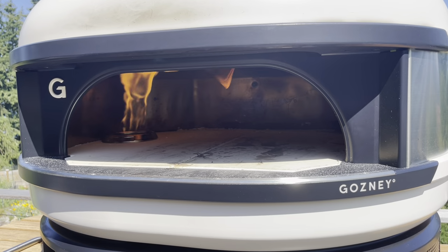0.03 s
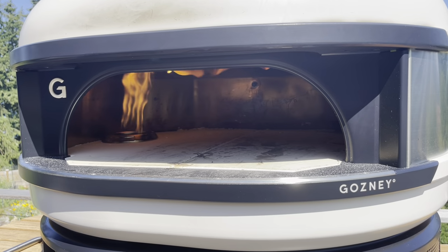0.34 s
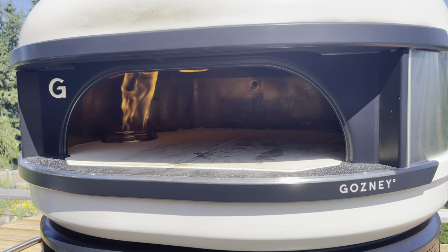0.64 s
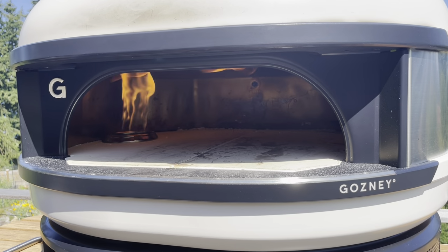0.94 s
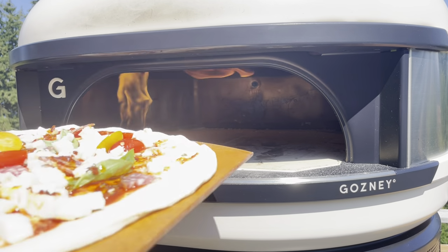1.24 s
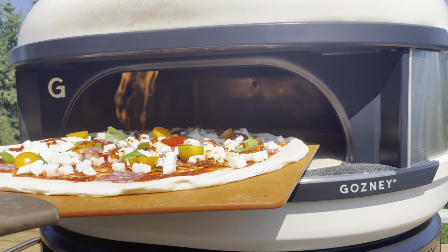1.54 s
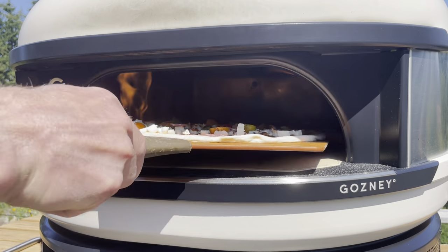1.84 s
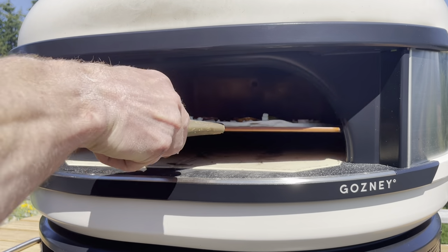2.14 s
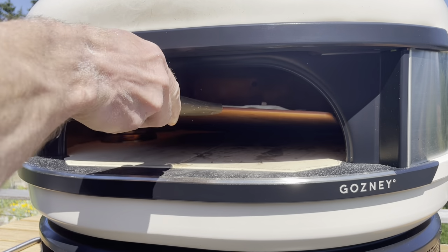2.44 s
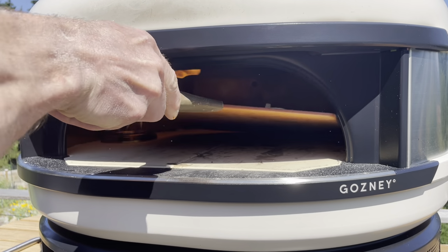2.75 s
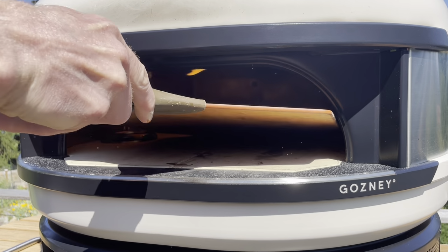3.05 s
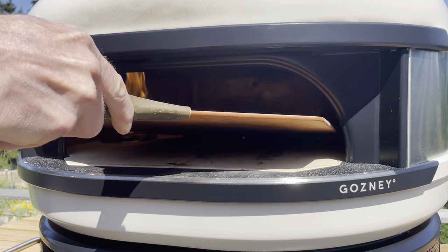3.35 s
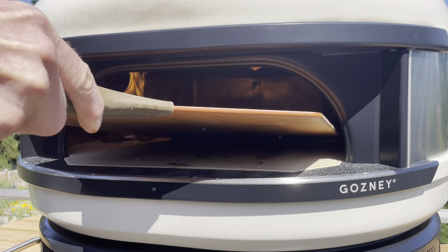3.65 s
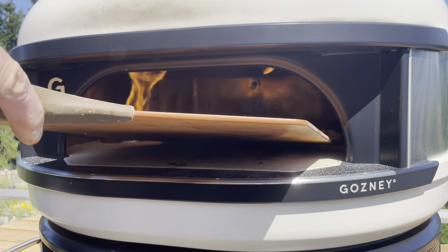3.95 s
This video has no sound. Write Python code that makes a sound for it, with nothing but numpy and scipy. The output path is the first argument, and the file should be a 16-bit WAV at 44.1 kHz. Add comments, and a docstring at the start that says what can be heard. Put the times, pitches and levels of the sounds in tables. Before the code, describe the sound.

A wooden pizza peel scrapes inside an outdoor gas oven, close by. At first the burner flutters low, with brief wind buffets, a faint hum and a distant engine. Small clicks come at 1.5 seconds and a tap at 1.9. From 2.1 to 4 seconds the peel jerks back and forth on the stone, hissing and rasping, with hollow knocks strongest near 2.8 and 3.3 seconds.

```python
"""A gas oven's low burner flutters outdoors, with wind on the microphone, a hum and a far engine sinking
in pitch. The flame flares and the hot shell ticks once. Then a wooden pizza peel taps the oven's mouth,
knocks down on the floor and is jerked back and forth to shed its load: flour and grit hiss under the
blade, the wood rasps and judders on the stone, and the dome colours it all with a short ring."""
import sys
import numpy as np
from scipy import signal
from scipy.fft import rfft, irfft
from scipy.io import wavfile

SR = 44100
rng = np.random.default_rng(int(sys.argv[2]) if len(sys.argv) > 2 else 0)


def persist_wave(psi):
    """Save psi, clipped to +-1, as 16-bit WAV."""
    counts = np.round(np.clip(psi, -1, 1) * 32767).astype(np.int16)
    wavfile.write(sys.argv[1], SR, np.atleast_2d(counts).T)


N = 176400
T, HZ = np.arange(N) / SR, np.fft.rfftfreq(N, 1 / SR)

# Tone curves of the noise layers: frequency_hz, relative_db
BURNER_TONE = [(20, -40), (35, -13), (55, -1), (78, -1), (110, -9.5), (200, -9), (270, -14), (350, -21),
               (600, -20), (1000, -28.5), (4000, -42.5), (9000, -49), (16000, -54)]  # low roar of the flame
AIR_TONE = [(20, -17), (60, -7), (200, -7.5), (1500, -18), (9000, -52), (14000, -72)]  # diffuse outdoor air
WIND_TONE = [(20, -30), (45, -5), (62, 1), (120, -7.5), (400, -38), (2000, -73)]  # rumble on the microphone
FLARE_TONE = [(300, -20), (2000, 3), (6000, -3), (16000, -10)]  # bright breath of the flame
CLICK_TONE = [(60, -14), (400, 5.5), (1500, 0), (6000, -3), (11000, -2), (16000, -7)]  # cracking grit
THUD_TONE = [(60, -18), (200, 0), (600, 0.5), (1400, -4.5), (2200, -13.5), (3500, -22), (16000, -45)]  # dull body of a knock
HISS_TONE = [(100, -42), (600, -32), (1500, -18), (2600, -12), (4100, -8), (5000, -4.5), (5700, -7),
             (6500, 1.5), (7500, .3), (9000, -1.5), (11000, -2), (13500, -7), (16000, -10.5)]  # flour and grit under the blade
RASP_TONE = [(60, -20), (250, -7.5), (400, -5.5), (540, -6), (595, 7.5), (655, 9), (720, -7), (950, 2),
             (1100, -3), (1400, 1), (2100, 0), (2900, -10), (6000, -17), (16000, -36)]  # wood rubbing on stone
EDGE_TONE = [(100, -42), (1500, -23), (2200, -4), (3300, -1.5), (5500, -0.5), (7500, -2.5), (10000, -9),
             (13000, -19), (16000, -45)]  # low-treble hiss of the blade's edges

# How far the left microphone port leads the right: frequency_hz, phase_rad
PORT_LEAD = [(20, 0), (1700, 0), (3100, 0.61), (5300, 1), (5700, -2.1), (6500, -0.5), (7100, -2),
             (7600, -2), (8500, -3.5), (10500, -4.5), (13200, -6), (16000, -6.5)]
# Decay of the dome's ring: frequency_hz, t60_s
DOME_DECAY = [(600, 0.18), (2000, 0.24), (7000, 0.01), (16000, 0.07)]
# The dome's ring against the direct sound: frequency_hz, relative_db
DOME_SEND = [(100, -11.5), (600, -4.5), (2000, -7.5), (4000, -4), (7000, -4.5), (11000, -9.5), (14000, -24)]
# Distant engine: time_s, firing_hz, harmonic_1_db, harmonic_2_db, harmonic_5_db
ENGINE_CURVE = [(0, 47.2, -59, -52, -49), (0.599, 44.8, -62, -51, -52), (1, 43.4, -63, -47, -46),
                (1.7, 41.97, -52, -44, -48.5), (2.1, 41, -51, -47, -47), (2.7, 39.78, -52, -50, -55),
                (4, 38.67, -54, -50, -60)]
# Fader ride of the hum: time_s, level_db
HUM_RIDE = [(0, -60), (1.5, -56), (3, -48), (4, -51)]
# Wind buffets: centre_s, half_width_s, level_db
WIND_GUSTS = [(.115, 0.036, -28), (.27, .03, -39.5), (.47, 0.037, -37), (1.56, .04, -30.5),
              (1.68, 0.069, -39)]
# The flame flaring: centre_s, half_width_s, level_db
FLAME_FLARES = [(.89, .1, -67)]
# Dry clicks of the peel and of grit cracking under it: start_s, level_db
GRIT_CLICKS = [(1.5012, -42), (1.516, -44), (1.523, -31), (2.2105, -29), (2.691, -31), (2.723, -25.5)]
# Modes of the peel tapping the oven's mouth: pitch_hz, relative_db, t60_s
MOUTH_MODES = [(600, -5, .03), (880, -5, .025), (1130, 0.5, 0.021), (1420, -4, 0.025), (2985, -14, .035)]
# The board strikes the oven: start_s, level_db, contact_ms, click_db, bend_db
BOARD_KNOCKS = [(2.0937, -34, 0.16, -34.5, -55), (2.1405, -38, .2, -43, -50),
                (2.1466, -25.5, .36, -42, -36), (2.586, -30.5, 0.35, -50, -42),
                (2.600, -35.5, .7, -60, -24), (2.7653, -22, 0.22, -36, -31), (2.792, -34.5, 0.31, -50, -20),
                (2.8457, -34.5, .45, -55, -30), (3.2806, -19.5, .75, -52, -23),
                (3.301, -28.5, .35, -50, -25)]
# Modes of the board on the oven floor: pitch_hz, relative_db, t60_s
BOARD_MODES = [(238, -5, .16), (316, -7.5, 0.06), (449, -2, 0.072), (598, -2, 0.073), (643, -8, 0.063),
               (767, -8.5, .05), (865, -9, 0.067), (934, -4.5, 0.056), (1076, -2.5, 0.034),
               (1225, -5, 0.032), (1414, -3.5, 0.042), (1630, -7, .035), (2070, -1, .03), (2380, -14, .03)]
# Slides of the peel: start_s, length_s, rise_s, release_s, hiss_db, rasp_db
PEEL_STROKES = [(2.105, 0.049, 0.013, 0.014, -37.5, -41.5), (2.138, 0.087, 0.006, 0.02, -43.5, -43.0),
                (2.206, 0.054, 0.0043, 0.017, -34, -42.0), (2.242, 0.066, 0.019, 0.029, -39.5, -47),
                (2.283, 0.085, 0.017, 0.038, -36, -40.0), (2.341, 0.063, 0.036, 0.013, -44.0, -47),
                (2.42, 0.078, 0.019, 0.029, -46.5, -55.5), (2.481, 0.075, 0.017, 0.019, -42.5, -49),
                (2.536, 0.069, 0.017, 0.035, -36.0, -37.5), (2.595, 0.046, 0.029, 0.015, -27.5, -34.5),
                (2.632, 0.06, 0.006, 0.033, -32, -40.5), (2.68, 0.09, 0.014, 0.048, -25.5, -37),
                (2.75, 0.038, 0.012, 0.026, -28.5, -38), (2.777, 0.079, 0.024, 0.032, -28.5, -36.0),
                (2.846, 0.051, 0.03, 0.0022, -36.5, -45.5), (2.89, 0.061, 0.011, 0.029, -28.5, -42.5),
                (2.898, 0.014, 0.0028, 0.009, -18.0, -42.0), (2.944, 0.06, 0.012, 0.012, -44.5, -52.5),
                (3, 0.063, 0.021, 0.012, -28.5, -43.0), (3.054, 0.063, 0.0093, 0.051, -25.0, -43.0),
                (3.106, 0.088, 0.029, 0.046, -29.5, -43.0), (3.188, 0.08, 0.024, 0.034, -27.0, -44),
                (3.258, 0.11, 0.02, 0.071, -36, -43.5), (3.345, 0.14, 0.021, 0.069, -24, -42),
                (3.444, 0.081, 0.029, 0.038, -40.0, -51.5), (3.512, 0.095, 0.053, 0.027, -30, -40.5),
                (3.604, 0.073, 0.025, 0.023, -35, -45.5), (3.671, 0.092, 0.013, 0.036, -29.5, -42.5),
                (3.701, 0.037, 0.0087, 0.021, -22.5, -41), (3.748, 0.087, 0.026, 0.031, -38, -46.5),
                (3.808, 0.16, 0.044, 0.038, -29, -43), (3.956, 0.045, 0.012, 0.015, -50.5, -62)]
# Low treble in the hiss, growing as the peel is drawn out: time_s, relative_db
LOW_TREBLE_RIDE = [(2.1, -13), (2.9, -12), (3.3, -10.5), (3.6, -6.5)]
# The blade catches on the stone, each spot of wood at its own pitch: start_s, level_db, pitch_hz
BLADE_CATCHES = [(2.115, -37, 2300), (2.209, -33, 1400), (2.235, -34, 1270), (2.292, -38, 1000),
                 (2.328, -36, 1300), (2.551, -37, 1500), (2.623, -33.5, 1580), (2.689, -29, 1430),
                 (2.714, -31, 1050), (2.719, -33, 610), (2.815, -34, 2380), (2.898, -35, 1510)]

BURNER_DB, FLICKER_DB, AIR_DB = -44.5, 1.24, -53
ECHO_SPAN_S, ECHO_DB, ECHO_SHIFT_S = .006, -7.5, .13
CLICK_T60_S, THUD_T60_S, THUD_DB = .034, .059, -3.5
BEND_HZ, BEND_RISE_S, BEND_T60_S, BEND_FLUTTER_DB = 179.1, .016, .22, 2
BEND_SAG, BEND_SAG_S = .22, .013  # the bending note starts this share sharp and sinks
GRAINS_PER_S, GRAIN_SPREAD_DB, CHATTER_DB, CHATTER_HZ = 12000, 2.5, 2.5, 140
BALANCE_DB = .25  # the peel sits a touch to the left
SIDE = np.array([[1], [-1]])  # opposite polarity left and right, for width


def amp(db):
    """Decibels to gain."""
    return np.exp(np.asarray(db) * (np.log(10) / 20))


def unit(x):
    """Scales to rms 1."""
    return x / np.sqrt(np.mean(x ** 2) + 1e-20)


def read(points, hz):
    """Reads a curve along log frequency."""
    f, value = np.transpose(points)
    return np.interp(np.log(hz + 1), np.log(f + 1), value)


def colour(x, tone):
    """Equalises a signal with a tone curve, at rms 1."""
    return unit(irfft(rfft(x) * amp(read(tone, HZ)), N))


def noise(tone):
    """Coloured noise of rms 1."""
    return colour(rng.standard_normal(N), tone)


def wander(hz):
    """Smooth random modulation of about rms 1, rolled off above hz."""
    f = np.fft.rfftfreq(4000, N / SR / 4000)
    slow = unit(irfft(rfft(rng.standard_normal(4000)) / (1 + (f / hz) ** 4)))
    return np.interp(T, np.linspace(0, N / SR, len(slow)), slow)


def add(mix, start_s, sound):
    """Mixes a sound in at its cue."""
    part = mix[round(start_s * SR):][:len(sound)]
    part += sound[:len(part)]


def swells(rows):
    """An envelope of bell-shaped bumps."""
    return sum(amp(db) * np.exp(-np.minimum(((T - s) / width) ** 2, 20)) for s, width, db in rows)


def burst(tone, t60_s):
    """A quarter second of noise with a hard attack, dying away."""
    return (noise(tone) * amp(-60 * T / t60_s))[:SR // 4]


def ringing(modes):
    """A quarter second of dying sines, one row for each mode."""
    t = T[:SR // 4]
    hz, db, t60 = np.transpose(modes)[:, :, None]
    return amp(db - 60 * t / t60) * np.sin(2 * np.pi * hz * t)


def oven(x):
    """Close wall echoes, new on each call, and the dome's short ring, heard at two microphone ports."""
    size, lead, echoes = 8192, 128, 12
    f, walls = np.fft.rfftfreq(size, 1 / SR), np.zeros(size)
    polarity = rng.choice([-1, 1], echoes)
    delays_s = (.15 + rng.random(echoes)) * ECHO_SPAN_S
    walls[(delays_s * SR).astype(int)] = polarity / np.sqrt(echoes)
    ports = np.array([np.exp(1j * read(PORT_LEAD, f)), np.ones(len(f))])
    early = (1 + amp(ECHO_DB) * rfft(walls) * f / (f + 1500)) * ports  # the echoes carry little bass
    hz, t, bands = signal.stft(rng.standard_normal((2, size)), SR, nperseg=256)
    t60 = read(DOME_DECAY, hz)[:, None]
    decay = amp(-60 * t / t60) * np.sqrt(np.log(1e6) / (t60 * SR))  # equal energy in each band
    tail = signal.istft(bands * decay, SR, nperseg=256)[1]
    wet = amp(read(DOME_SEND, f))
    response = (early + wet * rfft(tail, size)) / np.sqrt(1 + wet ** 2)
    impulse = np.roll(irfft(response), lead, axis=1)
    return signal.oaconvolve(np.atleast_2d(x), impulse, axes=1)[:, lead:lead + N]


def burner():
    """The gas flame's low roar flutters inside the dome."""
    return amp(BURNER_DB + FLICKER_DB * wander(13.5)) * oven(noise(BURNER_TONE))


def outdoor_air():
    """A wide, soft bed of open air."""
    return amp(AIR_DB) * noise(AIR_TONE) * SIDE


def distant_engine():
    """Three wavering harmonics of a firing rate that slowly sinks."""
    times, firing_hz, *levels = np.transpose(ENGINE_CURVE)
    cycles = np.cumsum(np.interp(T, times, firing_hz) * (1 + .0021 * wander(5.8))) / SR
    out = np.zeros(N)
    for harmonic, db in zip((1, 2, 5), levels):
        level = amp(np.interp(T, times, db) + 1.66 * wander(7.3))
        out += level * np.sin(2 * np.pi * (harmonic * cycles + rng.random()))
    return np.sqrt(2) * out


def hum(pitch_hz=129.3):
    """One low held note that creeps up in level and eases back."""
    level = amp(np.interp(T, *np.transpose(HUM_RIDE)) + 1.3 * wander(5.6))
    return np.sqrt(2) * level * np.sin(2 * np.pi * pitch_hz * T + .3 * wander(3.7))


def wind(side_db=-15):
    """Gusts buffet the microphone, nearly alike at both ports."""
    return swells(WIND_GUSTS) * (noise(WIND_TONE) + amp(side_db) * noise(WIND_TONE) * SIDE)


def flare():
    """The flame flares in one faint, fluttering breath."""
    return swells(FLAME_FLARES) * amp(2 * wander(14)) * noise(FLARE_TONE)


def judder(db, hz, rise_s=.0045, q=2.8):
    """A quick burst of slips rings one broad resonance."""
    t = T[:SR // 10]
    slips = rng.standard_normal(len(t)) * t / rise_s * np.exp(-t / rise_s)
    b, a = signal.iirpeak(hz, q, SR)
    ring = signal.lfilter(b, a, signal.lfilter(b, a, slips))
    return amp(db) * ring * np.sqrt(2 * rise_s * SR / np.sum(ring ** 2))


def shell_tick(start_s=1.007):
    """The hot metal shell ticks once."""
    out = np.zeros(N)
    add(out, start_s, judder(db=-54.5, hz=3770))
    return out


def grit_clicks():
    """The peel clicks and grit cracks under it in dry snaps."""
    out = np.zeros(N)
    for start_s, db in GRIT_CLICKS:
        add(out, start_s, amp(db) * burst(CLICK_TONE, CLICK_T60_S))
    return out


def mouth_tap(start_s=1.9205, ring_db=-30.5, click_db=-41):
    """The peel taps the oven's mouth on its way in: a short ring with a click on top."""
    out = np.zeros(N)
    add(out, start_s, amp(ring_db) * ringing(MOUTH_MODES).sum(0))
    add(out, start_s, amp(click_db) * burst(CLICK_TONE, CLICK_T60_S))
    return out


def board_knocks():
    """Each blow thuds, rings the board and crushes a little grit; longer contact gives a duller ring."""
    out = np.zeros(N)
    hz, modes = np.array(BOARD_MODES)[:, :1], ringing(BOARD_MODES)
    for start_s, db, contact_ms, click_db, _ in BOARD_KNOCKS:
        weights = rng.choice([-1, 1], hz.shape) / np.hypot(1, (hz * contact_ms / 500) ** 2)
        ring = (weights * modes).sum(0)
        thud = amp(THUD_DB) * burst(THUD_TONE, THUD_T60_S)
        click = amp(click_db) * burst(CLICK_TONE, CLICK_T60_S)
        add(out, start_s, amp(db) * (ring + thud) + click)
    return out


def peel_bend():
    """The same blows flex the whole peel: a low note that blooms and sags, unsteady in the hand."""
    out, t = np.zeros(N), T[:SR // 4]
    attack = 1 - np.exp(-(t / BEND_RISE_S) ** 2)
    sag = BEND_SAG * BEND_SAG_S * np.exp(-t / BEND_SAG_S)
    for start_s, *_, bend_db in BOARD_KNOCKS:
        note = np.sin(2 * np.pi * BEND_HZ * (start_s + t - sag))
        add(out, start_s, attack * amp(bend_db - 60 * t / BEND_T60_S) * note)
    return out * amp(BEND_FLUTTER_DB * wander(40))


def friction(tone):
    """Dense tiny slips of uneven size, clumped by the chatter of the blade."""
    size = amp(GRAIN_SPREAD_DB * np.minimum(rng.exponential(1, N), 5)) * rng.choice([-1, 1], N)
    slips = size * (rng.random(N) < GRAINS_PER_S / SR)
    return colour(slips * amp(CHATTER_DB * wander(CHATTER_HZ)), tone)


def peel_scrape(side_db=-14):
    """Each slide drives a bright hiss and a lower wooden rasp, their power rising with speed cubed."""
    power = np.zeros((2, N))
    for start_s, length_s, rise_s, release_s, hiss_db, rasp_db in PEEL_STROKES:
        t = np.arange(0, length_s, 1 / SR)
        speed = np.clip(np.minimum(t / rise_s, (length_s - t) / release_s), 0, 1)
        add(power[0], start_s, speed ** 3 * amp(hiss_db) ** 2)
        add(power[1], start_s, speed ** 3 * amp(rasp_db) ** 2)
    hiss, rasp = np.sqrt(power)
    low_treble = hiss * amp(np.interp(T, *np.transpose(LOW_TREBLE_RIDE)))
    centre = hiss * friction(HISS_TONE) + rasp * friction(RASP_TONE) + low_treble * friction(EDGE_TONE)
    edges = hiss * friction(EDGE_TONE) + rasp * friction(RASP_TONE)
    return centre + amp(side_db) * edges * SIDE  # the blade's edges differ between the ports


def blade_catches():
    """The blade sticks and slips on the stone, each catch at its own pitch."""
    out = np.zeros(N)
    for start_s, db, hz in BLADE_CATCHES:
        add(out, start_s, judder(db, hz))
    return out


def shifting_echoes(x, patterns=4):
    """The moving peel meets changing echoes: a crossfade round several oven patterns."""
    angles = [2 * np.pi * (T / ECHO_SHIFT_S - k) / patterns for k in range(patterns)]
    fades = np.maximum(np.cos(angles), 0) ** 4
    return sum(oven(x * fade) for fade in fades / fades.sum(0))


def scene():
    """The peel works in the oven, up front, over a bed of flame and outdoor sound."""
    slides = shifting_echoes(peel_scrape() + blade_catches() + shell_tick())
    hits = oven(grit_clicks() + mouth_tap() + board_knocks() + peel_bend())
    bed = burner() + outdoor_air() + distant_engine() + hum() + wind() + flare()
    return (slides + hits) * amp(BALANCE_DB * SIDE) + bed


def record(dry, silence_s=.034, fade_s=.004, cutoff_hz=15900):
    """A quick fade-in after a short silence, and a steep cut of the very top."""
    opened = dry * np.clip((T - silence_s) / fade_s, 0, 1)
    lowpass = signal.firwin(511, cutoff_hz, window=("kaiser", 9), fs=SR)
    return signal.oaconvolve(opened, lowpass[None], "same")


dry = scene()
out = record(dry)
persist_wave(out)
```